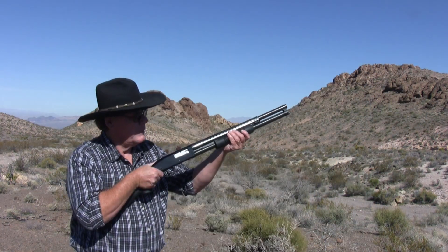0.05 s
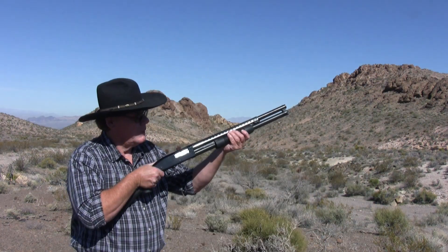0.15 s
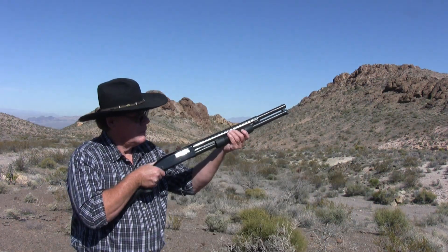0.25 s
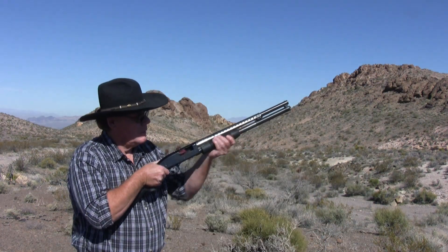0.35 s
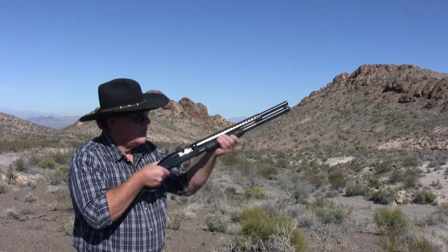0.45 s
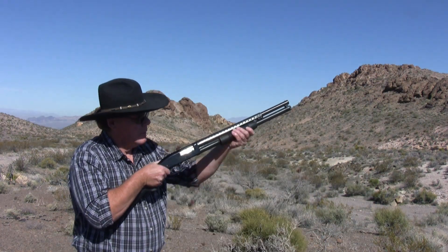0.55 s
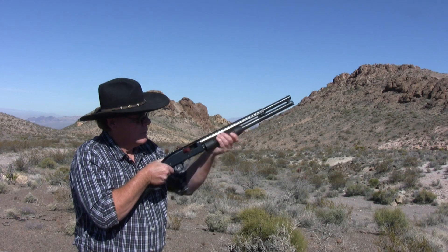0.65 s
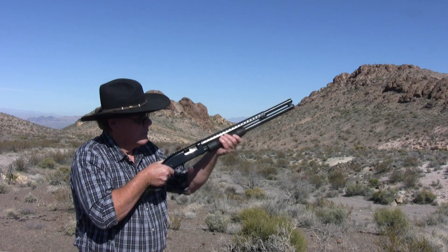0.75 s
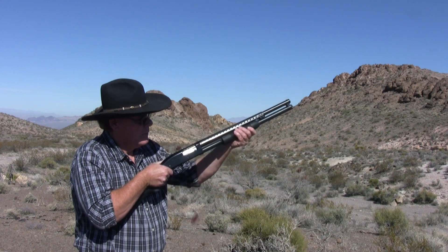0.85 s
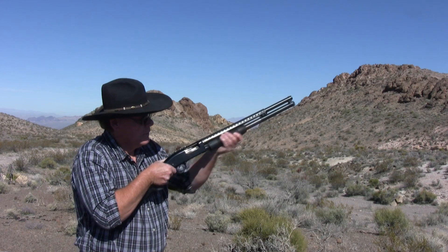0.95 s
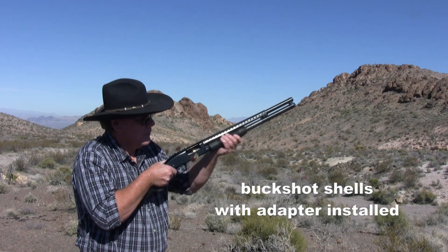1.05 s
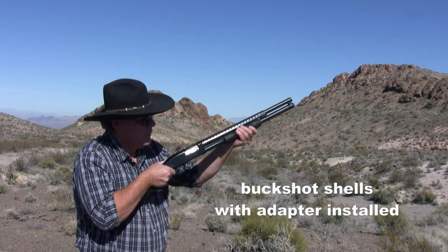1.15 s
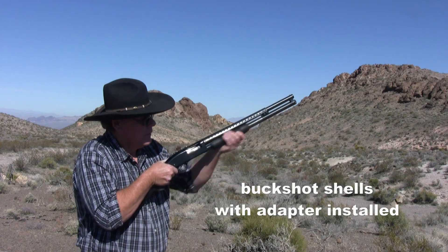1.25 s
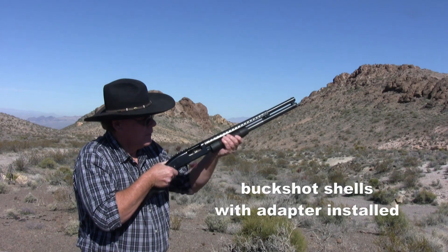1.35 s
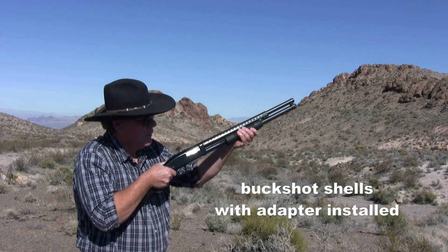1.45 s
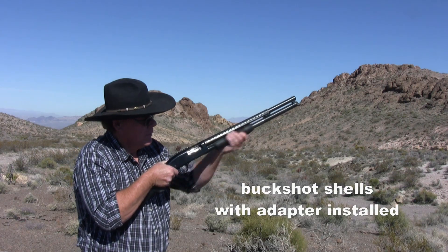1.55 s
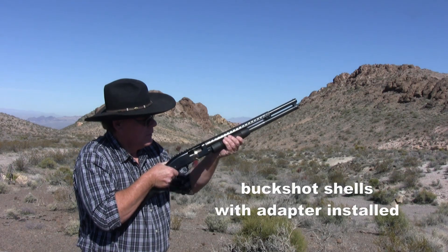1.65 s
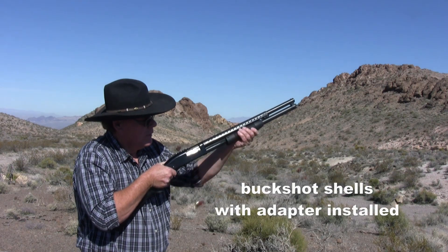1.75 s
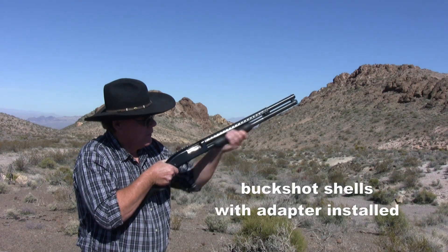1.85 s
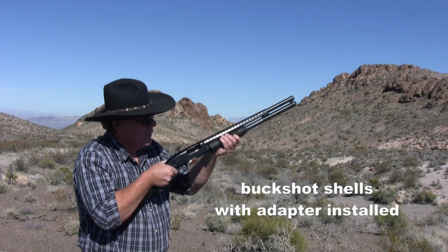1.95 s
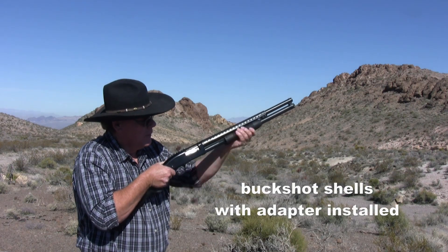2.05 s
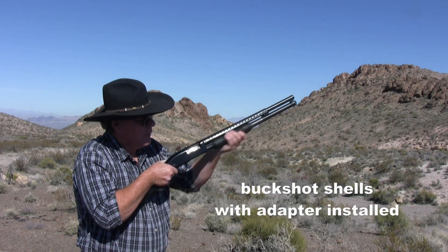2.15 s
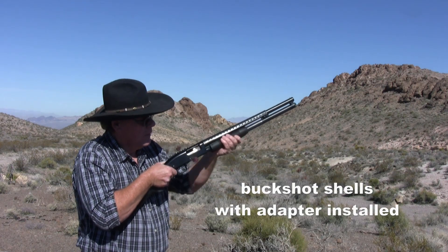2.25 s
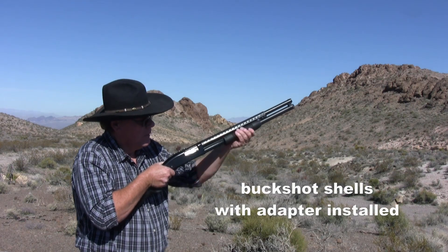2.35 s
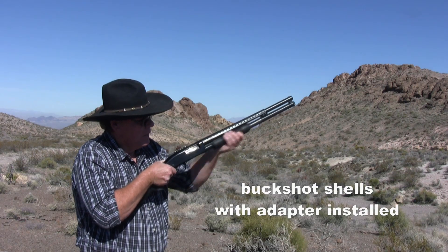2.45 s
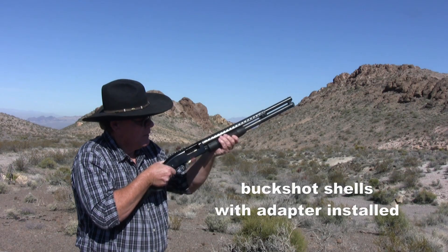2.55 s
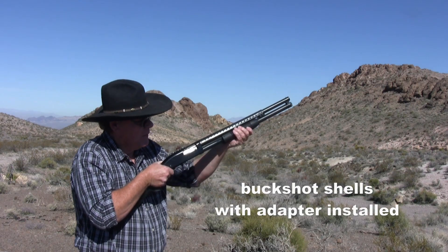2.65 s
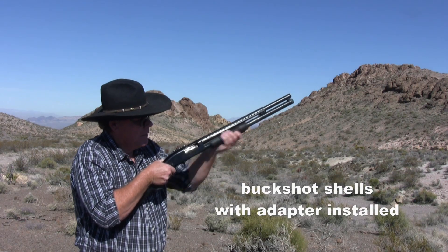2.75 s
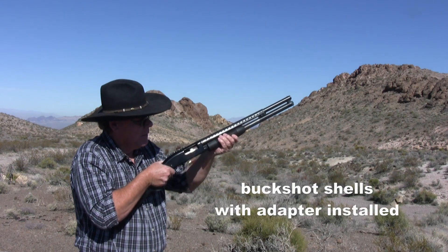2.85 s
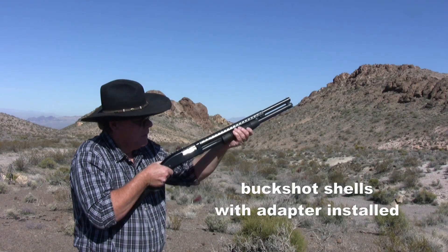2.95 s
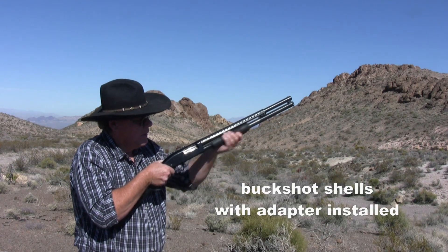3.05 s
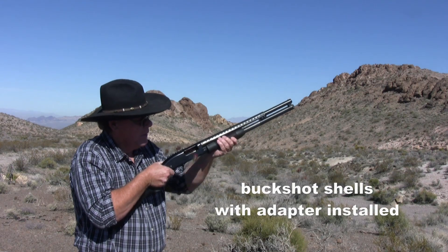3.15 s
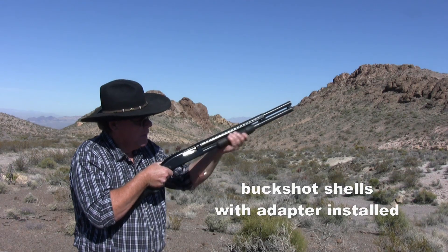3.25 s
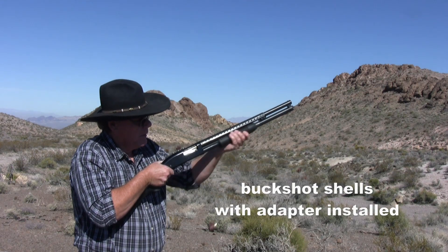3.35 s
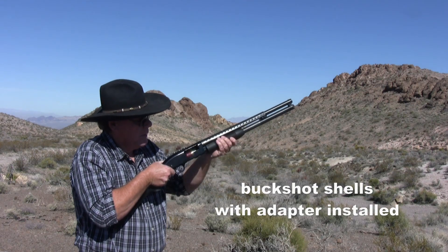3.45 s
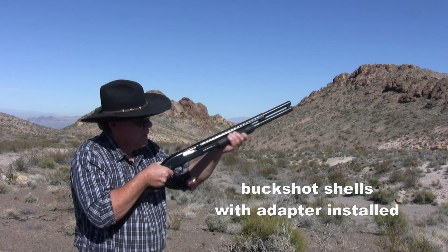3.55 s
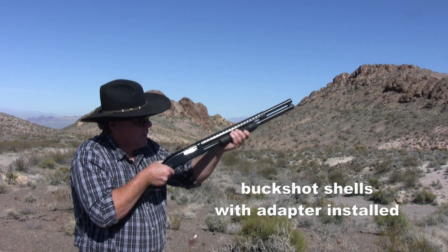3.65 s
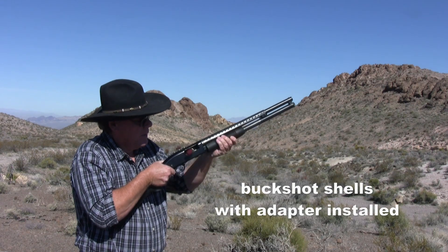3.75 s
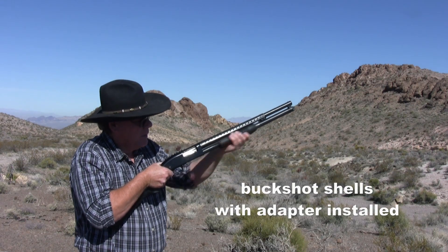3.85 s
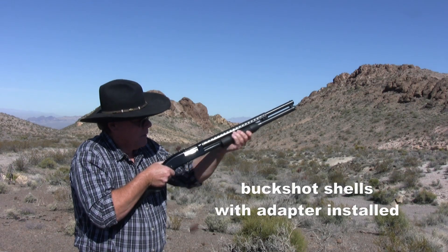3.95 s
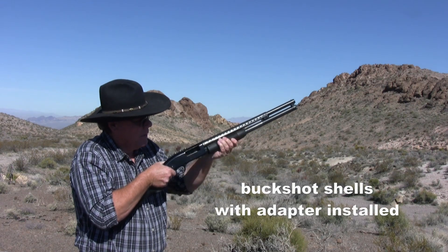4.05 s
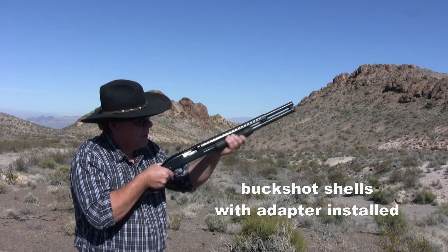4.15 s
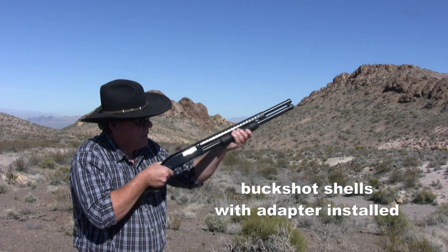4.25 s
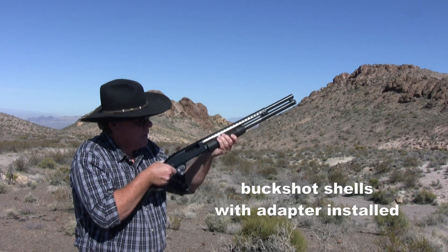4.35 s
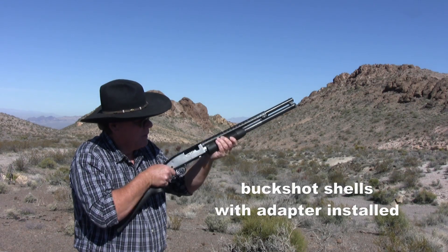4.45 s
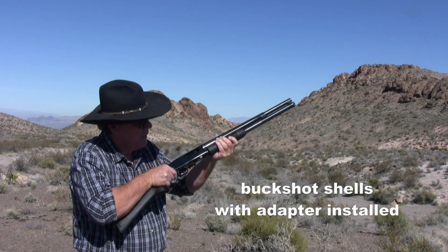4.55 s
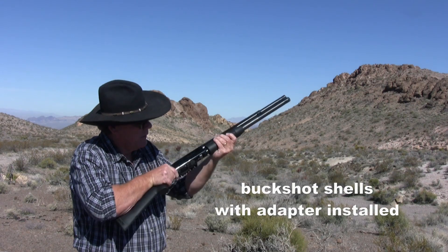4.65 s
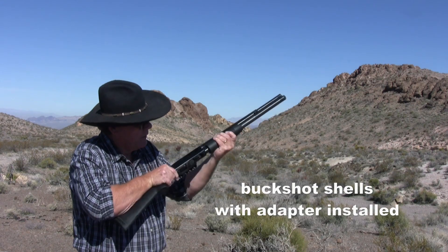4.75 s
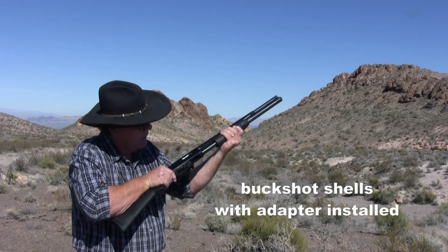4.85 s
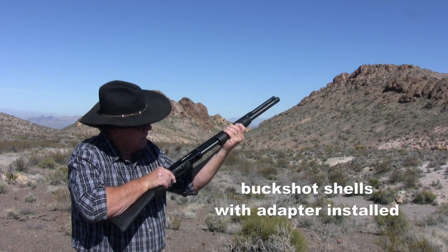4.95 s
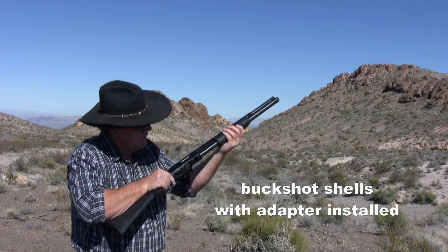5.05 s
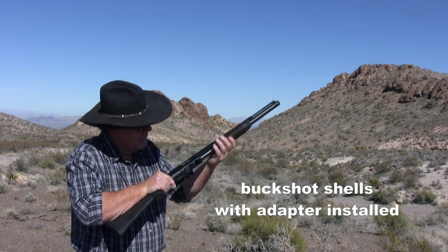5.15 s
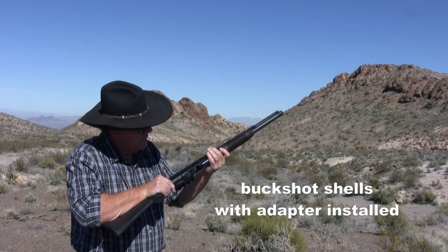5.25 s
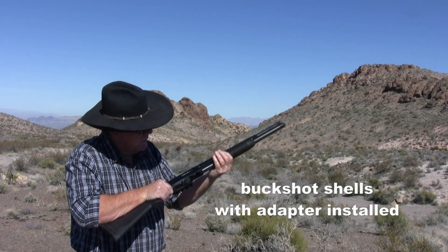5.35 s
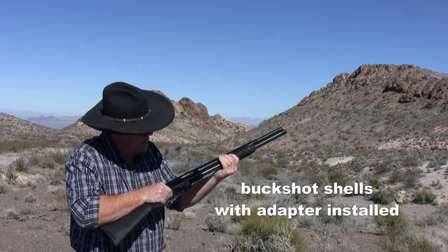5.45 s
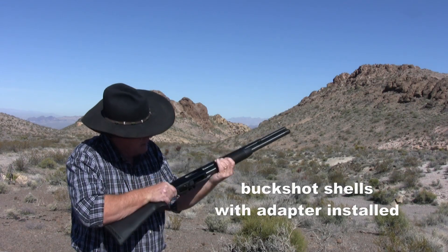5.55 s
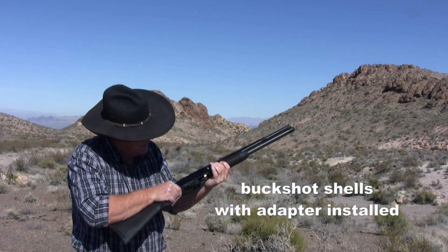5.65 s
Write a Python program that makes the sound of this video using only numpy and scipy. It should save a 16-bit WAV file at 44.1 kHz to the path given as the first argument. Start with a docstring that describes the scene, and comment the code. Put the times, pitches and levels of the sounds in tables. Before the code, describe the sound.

Close, dry, rapid back-and-forth clacking of a shotgun slide in open air, a brief lull of light rattles, then a few slow strokes.

```python
"""Fast pump-action racking in open desert

A shotgun is racked fast: each stroke is a scraping slide, a few catches and a hard double stop.
Contacts are dense noise bursts, the slide is a stream of tiny catches; both ring steel and plastic modes.
The stock thuds as low sines, the emptied barrel sings faintly, hands and shells tick as softer bursts.
Coloured noise makes the wind rumble on the microphone ports and the faint hiss over it.
"""
import sys
import numpy as np
from scipy import signal
from scipy.fft import rfft, irfft
from scipy.io import wavfile
from scipy.ndimage import uniform_filter1d

SR = 44100
rng = np.random.default_rng(int(sys.argv[2]) if len(sys.argv) > 2 else 0)


def rack_gain(trim_db):
    """Turn a fader trim in dB into the linear factor to multiply a signal by."""
    fader = np.asarray(trim_db, float)
    return 10 ** (fader / 20)


def transcribe(u):
    """Save the signal u as a 16-bit wav file named by the first command-line argument.

    u: samples, shape (n,) or (channels, n), limited to [-1, 1]; the rate is SR.
    q: integer samples, one column per channel.
    """
    v = np.clip(np.atleast_2d(u).T, -1, 1)
    q = np.round(v * 32767).astype(np.int16)
    wavfile.write(sys.argv[1], SR, q)


N = 250752

# wind rumble over time: [t/s, level/dB]
WIND_LEVEL = [(0.0, -38.5), (0.08, -30.5), (0.47, -34), (0.71, -61), (1.0, -47), (1.23, -55), (4.43, -54.5),
              (5.61, -35.5), (5.69, -40)]
# spectrum of the wind rumble: [f/Hz, level/dB]
RUMBLE_SPECTRUM = [(12, -40), (20, 16.5), (38, 6.5), (81, 5.5), (177, -10.5), (228, -11), (275, -13.5),
                   (400, -42.5), (520, -67), (880, -120)]
# hiss of open air and sleeves over time: [t/s, level/dB]
HISS_LEVEL = [(0, -53.5), (.2, -56), (.45, -58), (.75, -50.5), (2.5, -58), (4.55, -61), (4.7, -61),
              (4.85, -53), (5.13, -63), (5.25, -55.5), (5.35, -53), (5.41, -59), (5.57, -54), (5.62, -58)]
# spectrum of that hiss: [f/Hz, level/dB]
HISS_SPECTRUM = [(280, 1.5), (480, 1.5), (624, -3.5), (2050, -10.5), (2910, -12), (3320, -10), (5360, -8.5),
                 (6020, -13), (15500, -23)]
# level of the side signal over frequency: [f/Hz, level/dB]
SIDE_GAIN = [(60, 3), (180, -8.5), (550, -14.5), (1650, -24), (4970, -20), (15000, -7)]
# low thuds of stock and tube at stops, locks and some releases: [t/s, level/dB, f/Hz]
THUMPS = [(0.534, -47, 237), (0.688, -34, 166.6), (0.837, -40, 265), (1.018, -38.5, 177), (1.151, -44, 253),
          (1.32, -41, 166), (1.626, -47, 173), (1.93, -42.5, 174), (1.993, -40, 248), (2.234, -39.5, 170),
          (2.37, -42, 234), (2.54, -46, 164), (2.611, -49, 246), (2.833, -41, 171), (3.121, -37.5, 168),
          (3.272, -40.5, 213), (3.43, -41, 185), (3.732, -41.5, 171), (4.028, -44, 286), (4.349, -48, 276)]
# rear stops after which the emptied barrel rings on: [t/s, level/dB]
EMPTY_STOPS = [(4.183, -44), (4.509, -41.5)]
# tones of the emptied barrel: [f/Hz, level/dB, t60/s]
BARREL_TONES = [(650, 1, 0.14), (6760, -8, .35), (7300, 2, 0.18), (7760, -1, 0.2)]
# small ticks of hands, loose parts and settling shells:
# [t/s, level/dB, low weight/dB, high weight/dB, chatter/ms]
TICKS = [(4.572, -48, 4, -10, 1.5), (4.586, -28.5, 31, -12, 1.5), (4.612, -50, -6, -12, 0.98),
         (4.623, -33, -8, -22, 3.3), (4.6527, -9.5, -3, 3, 0.18), (4.6648, -28, -9, -14, 1.6),
         (4.709, -34.5, 21, -12, 1.5), (4.718, -33.5, -16, -10, 1.3), (4.727, -35, 9, -12, 1.3),
         (4.765, -29, -15, -12, 1.5), (4.7758, -25, -10, -13, 0.7), (4.7924, -20.5, -2, -9, 0.4),
         (4.813, -35, 26, -19, 1.1), (4.871, -30, -8, -19, 1.5), (5.16, -30.5, 15, -28, 2),
         (5.1759, -27, 3, -29, 9.3), (5.1939, -33, 4, -19, 6), (5.2002, -19, -4, -23, 2.75),
         (5.2172, -23.5, -2, -19, 3.4), (5.258, -31, -4, -14, 1.5), (5.359, -30.5, 15, -26, 3.7),
         (5.4418, -20.5, -7, -12, 3.3), (5.4537, -8, -7.5, -17, 0.8)]
# contacts outside the pattern, loose parts and the slow last strokes: columns as in TICKS
LOOSE_KNOCKS = [(0.4452, -26, -12, -18, 2.1), (0.4517, -22, 0, -32, 1.7), (0.4663, -12, -6, -14, 3.3),
                (0.566, -7.5, -24, -14, 1.8), (0.7686, -22, -5, -9, 4.7), (0.8982, -18, -11, -5, 2),
                (0.9114, -13.7, -21, -4, 2.1), (1.2202, -8, -26, -1, 1), (1.379, -14.5, 0, -2, 2.7),
                (1.41, -8, -15, -21, 0.56), (1.5232, -9.5, -8, -5, 2.1), (1.5557, -6, -10, -6, 1.7),
                (1.7108, -12, -14, -19, 2.0), (1.8223, -11, -7, 0, 2.0), (1.832, -13, -20, -8, 13),
                (1.9982, -8.5, 8, -5, 0.48), (2.1206, -15, -16, 1, 4.1), (2.3125, -14, -17, -30, 0.71),
                (2.6122, -14, 23, -15, 0.42), (2.8033, -20, -10, -6, 1.8), (3.2156, 2.5, -7.5, -7, 0.28),
                (3.2972, -8.5, -7.5, -10, 3.2), (3.3145, -14, 5, -4, 3.7), (3.4027, -11, -13, -18, 1.8),
                (3.514, -12, -12, -14, 1), (4.1271, -4, -24, -14, 0.53), (4.1596, -10, -17, -10, 10.8),
                (4.3856, -17.5, -1, -8, 1.1), (4.443, -15, -18, -20, 1.2), (4.48, -12, -13, -1, 4.2),
                (4.8802, -23, -12, -20, 1), (4.8971, -11, -8, -21, 1.1), (4.91, -17, 5, -23, 11),
                (4.932, 1.5, -5.5, -2, 3.1), (4.9786, -13, -1, -24, 3.4), (4.9958, -21, 12, -24, 1.5),
                (5.0253, -1.5, -5, -2, 3.6), (5.0407, -5.5, 4, 2, 3), (5.0477, -1, -7, -10.5, 4.6),
                (5.0575, 4.2, -8, -6.5, 1.5), (5.63, -23, -24, -9, 1), (5.6336, -12.5, -5, -20, 1.8),
                (5.648, -2.5, -14, -18, 0.77), (5.6617, 0.5, -14, -17.5, 2.1), (5.672, -4.5, -4, -17, 1.6)]
# strongest modes of receiver, barrel and bars: [f/Hz, level on top of the clatter/dB, t60/s]
GUN_MODES = [(624, -8, .06), (830, -8, .02), (2100, -1, .016), (2720, -6, .02), (4770, -1, .012),
             (6800, -5, .008), (1067, -2, .024), (1300, 0.5, .018), (1480, 0, .018)]
# spectrum of the rubbing rails: [f/Hz, level/dB]
RUB_SPECTRUM = [(150, -25), (250, -11.5), (500, -7.5), (1040, -8.5), (2060, 0), (2530, -3), (3750, 3.5),
                (6150, -6), (7690, -3.5), (15000, -15)]
# rubbing outside the fast run: [t/s, level/dB]
SLOW_RUBBING = [(0.419, -66), (0.441, -61), (0.45, -48), (0.755, -70), (4.54, -51), (4.614, -67),
                (4.86, -73), (4.897, -55), (4.906, -36), (4.937, -26.5), (4.972, -43.5), (5.014, -34),
                (5.029, -22), (5.055, -30), (5.086, -54), (5.135, -64.5), (5.625, -55.5), (5.635, -50),
                (5.668, -24.5), (5.685, -32.5)]
# slide pulled open: [extractor catch t/s, rear stop t/s, catch level/dB, stop level/dB, second blow level/dB]
OPENINGS = [(0.5056, 0.5438, 3, 5, -0.5), (0.81, 0.8411, 0, 6, 0.5), (1.1198, 1.1509, -6, -0.5, 5.5),
            (1.4247, 1.4568, -5.5, 0, 4.5), (1.731, 1.7652, -6, 0.5, 3), (2.0322, 2.0641, -7, 2, 3),
            (2.3327, 2.3654, -6, -1.5, 4.5), (2.6327, 2.6669, -7.5, 0.8, 0),
            (2.9268, 2.9633, -7.5, 2.5, -1.5), (3.232, 3.2712, -9, 1, 0.5),
            (3.5356, 3.5729, -10, -0.5, -0.5), (3.8384, 3.88, -8.5, 0.5, 2.5), (4.1383, 4.1742, -8, -1, 7),
            (4.4576, 4.4983, -11, 0.5, 0)]
# slide pushed shut: [first knock t/s, bolt locks t/s, knock level/dB, lock level/dB, second blow level/dB]
CLOSINGS = [(0.64, 0.6967, 0, 3.5, 1.5), (0.957, 1.0209, -2.5, 2.5, -1), (1.264, 1.3247, -4, -0.5, 2.5),
            (1.5645, 1.6335, -5, -1.5, -2), (1.8647, 1.9327, -4.5, 3.4, 4), (2.178, 2.2396, -3, -3, 4.5),
            (2.458, 2.5296, -7, 2, -12), (2.7693, 2.836, -4, 0.5, 2.5), (3.0615, 3.1313, -4.5, 0, 2.5),
            (3.3715, 3.438, -0.5, 0.2, -0.8), (3.6706, 3.7403, -3.5, -0.5, 3), (3.9745, 4.0285, -5, 2.5, 0),
            (4.2886, 4.347, -4, 2, 1.4)]
# contacts along every opening:
# [place (0 catch, 1 stop), level against its blow/dB, low weight/dB, high weight/dB, chatter/ms]
OPENING_CONTACTS = [(0.0, -0.5, -12.5, -12.5, 1.9), (0.305, 0.4, -22.5, -13, 5.1),
                    (1.0, 0.5, -10, -4.5, 3.3), (1.254, 1.56, -2.5, -5, 1.1)]
# contacts along every closing: [place (0 first knock, 1 lock), then as in OPENING_CONTACTS]
CLOSING_CONTACTS = [(0.0, -0.53, -10, -3, 3.7), (0.82, -1.4, -8, -7, 4.3), (1.0, -0.14, -1.5, -3.5, 2.2),
                    (1.115, 0.18, -5, -4.5, 1.17)]
# action released at the start of each pull: [t/s, level/dB]
RELEASES = [(0.4784, 0), (0.788, -5), (1.094, -9.5), (1.398, -11.5), (1.7017, -13), (2.0057, -12.5),
            (2.3081, -7), (2.605, -12.5), (2.8997, -11.5), (3.2, -9.5), (3.504, -11.5), (3.807, -13.5),
            (4.1082, -9.5), (4.4257, -10.5)]
# carrier springs up after the rear stop: [t/s, level/dB]
SPRINGS = [(0.5904, -10.5), (0.8825, -10.5), (1.1926, -5.5), (1.4995, -8), (1.8073, -6), (2.1058, -8.5),
           (2.4057, -7), (2.7046, -6), (2.9988, -5.5), (3.3037, -6), (3.599, -5.5), (3.9073, -8.5)]
# hand starts forward again: [t/s, level/dB]
PUSHES = [(0.615, -9.5), (0.9408, -11.5), (1.2374, -12.5), (1.5396, -16), (1.8307, -17), (2.152, -19),
          (2.4427, -13.5), (2.7485, -16), (3.042, -25), (3.3428, -32), (3.6436, -31), (3.9481, -19),
          (4.2642, -24)]
# knock of the bolt midway forward, on a shell until the gun is empty:
# [t/s, level/dB, chatter/ms, rubbing level at the turn of the hand before it/dB]
MIDWAY_KNOCKS = [(0.6625, -3, 6.6, -33), (0.9821, -4, 3.5, -39.5), (1.2878, -5.5, 6, -37.5),
                 (1.5891, 1.5, 0.67, -39), (1.8923, -5.5, 4.7, -39), (2.202, -3.5, 1.4, -35.5),
                 (2.4851, -5, 4.7, -40), (2.7965, -8, 4.9, -36), (3.0893, -6, 3.5, -34.5),
                 (3.3962, -4, 2.5, -40), (3.6963, -3.5, 4.8, -38), (3.9962, -7.5, 2.8, -51),
                 (4.3121, -2, 0.52, -53.5)]

# colour of each contact: (low weight/dB, high weight/dB, chatter/ms); MIDWAY takes its chatter from its rows
SLACK, RELEASE, SPRING = (-10, -11, 2.2), (-9.5, -11.5, 6.4), (-24, -3, 2.84)
PUSH, MIDWAY = (-3.5, -7, 3.3), (-9, -16.5)
SLACK_DB, SLACK_LEAD_S = -19.5, 0.0092   # play is taken up just before each release
CONTACT_SCATTER_DB = 1.5

# rubbing around the marks of a stroke: [t after the mark/s, level/dB]
AT_RELEASE, AT_CATCH = [(-0.002, -45), (0.003, -37.5)], [(-0.006, -36), (0.001, -32)]
AT_PUSH, AT_FIRST_KNOCK = [(0.005, -33.5)], [(-0.003, -34.5), (0.003, -35.5)]
AT_MIDWAY = [(-0.003, -34.5), (0.004, -26.5)]
AT_LOCK = [(-0.016, -33.5), (-0.009, -28.5), (0.006, -28), (0.027, -51.5), (0.04, -52.5)]
AT_STOP, RUB_FOLLOWS = (0.005, -26.5), 1   # dB of rubbing added per dB of the harder blow
STOP_FADE_S, STOP_FADE_DB = 0.026, 1   # after the stop, rubbing fades to just over its turning level
TURN_LEAD_S = 0.0044   # the slide is slowest just before the push


def at_hz(points, hz):
    """Reads a spectrum on a log-frequency axis."""
    table_hz, table_db = np.transpose(points)
    return np.interp(np.log(hz), np.log(table_hz), table_db)


def in_time(rows):
    """Turns each column of a timed table into straight-line automation."""
    s, *columns = np.transpose(rows)
    return [np.interp(np.arange(N) / SR, s, column) for column in columns]


def coloured(x, points):
    """Gives a white signal a spectrum and brings it to rms 1."""
    hz = np.maximum(np.fft.rfftfreq(N, 1 / SR), 1)
    y = irfft(rfft(x) * rack_gain(at_hz(points, hz)), N)
    return y / np.sqrt(np.mean(y ** 2))


def drift(corner_hz):
    """Slow random wander with spread 1: noise through two equal low-pass poles."""
    r = np.exp(-2 * np.pi * corner_hz / SR)
    settled = signal.lfilter([1], [1, -2 * r, r * r], rng.standard_normal(N + SR))[SR:]
    return settled / settled.std()


def spread(mid, side):
    """Left and right from a middle signal and a side signal levelled over frequency."""
    hz = np.maximum(np.fft.rfftfreq(N, 1 / SR), 1)
    side = irfft(rfft(side) * rack_gain(at_hz(SIDE_GAIN, hz)), N)
    return np.array([mid + side, mid - side])


def wind(own_db=-27.5, air_side_db=-10.5):
    """Lumpy rumble at the ports, mostly shared by both sides, and a thin wavering hiss."""
    (rumble_db,), (hiss_db,) = in_time(WIND_LEVEL), in_time(HISS_LEVEL)
    gusty_db, wavering_db = 1.4, 0.6
    white = rng.standard_normal((5, N))
    own = np.array([coloured(w, RUMBLE_SPECTRUM) for w in white[1:3]])
    rumble = coloured(white[0], RUMBLE_SPECTRUM) + rack_gain(own_db) * own
    mid = coloured(white[3], HISS_SPECTRUM)
    side = rack_gain(air_side_db) * coloured(white[4], HISS_SPECTRUM)
    hiss = np.array([mid + side, mid - side])
    rumble_gain = rack_gain(rumble_db + gusty_db * drift(9.5))
    hiss_gain = rack_gain(hiss_db + wavering_db * drift(16))
    return rumble_gain * rumble + hiss_gain * hiss


def thumps(t60=0.13, rise_ms=2.0):
    """A soft push sets the stock and tube humming low: sines that swell in and die."""
    t, out = np.arange(SR // 4) / SR, np.zeros(N + SR)
    for s, peak_db, hz in THUMPS:
        envelope = rack_gain(-60 * t / t60) * (1 - np.exp(-1000 * t / rise_ms))
        ring = np.sin(2 * np.pi * hz * t) * envelope
        start = round(s * SR)
        out[start:start + len(t)] += rack_gain(peak_db) * ring / np.abs(ring).max()
    return out[:N]


def barrel():
    """Thin dying tones after a rear stop of the emptied gun."""
    out = np.zeros(N)
    for s, blow_db in EMPTY_STOPS:
        t = np.maximum(np.arange(N) / SR - s, 0)
        for hz, level_db, t60 in BARREL_TONES:
            out += rack_gain(blow_db + level_db - 60 * t / t60) * np.sin(2 * np.pi * hz * t)
    return out


def knocks(rows, scatter_db=1.0, bass_fall_db=-8.5, deep_fall_db=-48.0, crack_db=9.5, top_fall_db=-25.5,
           trim_db=-3.0, rise_ms=0.36, tail_db=-12.0, tail_ms=10.16):
    """Each contact is a burst of bounces too dense to count, with its own colour and a short dying tail."""
    size, lead_ms, uneven_db = 4096, 4, 2.5
    ms, hz = 1000 * np.arange(size) / SR, np.maximum(np.fft.rfftfreq(size, 1 / SR), 1)
    mode_hz = np.geomspace(1600, 16000, 24)
    after = np.maximum(ms - lead_ms, 0)
    draws = rng.standard_normal((len(rows), 3, size))
    lumps = rng.standard_normal((len(rows), 2, 24))
    out = np.zeros((2, N + SR))   # middle and side
    for (s, peak_db, low_db, high_db, chatter_ms), draw, lump in zip(rows, draws, lumps):
        colour = [(150, low_db + deep_fall_db), (300, low_db + 0.42 * deep_fall_db),
                  (450, low_db + bass_fall_db), (1300, low_db - 2), (4000, 0.0049),
                  (10000, high_db - 3), (13500, high_db - 9.5), (16000, high_db + top_fall_db)]
        chatter_ms = max(chatter_ms, .2)
        tail = rack_gain(tail_db) * np.exp(-after / tail_ms / np.sqrt(chatter_ms / 3))
        fading = np.exp(-after / chatter_ms) + tail
        # bounces come in clumps; averaging 25 samples shrinks the spread by sqrt(25)
        bumps = rack_gain(uneven_db * np.sqrt(25) * uniform_filter1d(draw[2], size=25))
        burst = draw[:2] * bumps * fading * (1 - np.exp(-after / rise_ms))
        # first metal contact: one click of either polarity
        burst[:, round((lead_ms + rise_ms) * SR / 1000)] += rack_gain(crack_db) * np.sign(lump[:, 0])
        # which modes the blow finds
        struck_db = np.array([np.interp(hz, mode_hz, scatter_db * row, left=0) for row in lump])
        sound = irfft(rfft(burst) * rack_gain(at_hz(colour, hz) + struck_db), size)
        start = round((s - lead_ms / 1000) * SR)
        level = rack_gain(peak_db + trim_db) / np.abs(sound).max(axis=1, keepdims=True)
        out[:, start:start + size] += level * sound
    return out[:, :N]


def handling():
    """Hands, loose parts and settling shells tick with more body and more varied colour than the gun."""
    return knocks(TICKS, bass_fall_db=0.5, deep_fall_db=-10.0, tail_db=-11.5, scatter_db=3.0)


def around(marks, shape):
    """Places the same short rubbing shape at every mark."""
    return [(mark + s, db) for mark in marks for s, db in shape]


def rubbing():
    """Rubbing level of the rails: it follows the marks of each stroke, dips at the turn, falls after the lock."""
    catch, stop, _, stop_db, again_db = np.transpose(OPENINGS)
    first_knock, lock = np.transpose(CLOSINGS)[:2]
    midway, _, _, turn_db = np.transpose(MIDWAY_KNOCKS)
    release, push = np.transpose(RELEASES)[0], np.transpose(PUSHES)[0]
    rows = SLOW_RUBBING + around(release, AT_RELEASE) + around(catch, AT_CATCH) + around(push, AT_PUSH)
    rows += around(first_knock, AT_FIRST_KNOCK) + around(midway, AT_MIDWAY) + around(lock, AT_LOCK)
    rows += zip(stop + AT_STOP[0], AT_STOP[1] + RUB_FOLLOWS * np.maximum(stop_db, again_db))
    rows += zip(stop + STOP_FADE_S, turn_db + STOP_FADE_DB)
    rows += zip(push - TURN_LEAD_S, turn_db)
    return in_time(sorted(rows))[0]


def slide(grains_per_s=7400.0):
    """Rails rub as dense tiny catches of uneven size that come in lumps."""
    uneven_db, lumpy_db = 3.2, 2.6
    rubbing_db = rubbing()
    hits = rng.random((2, N)) < grains_per_s / SR
    polarity = rng.choice([-1, 1], (2, N))
    grains = hits * polarity * rack_gain(uneven_db * rng.exponential(1, (2, N)).clip(0, 4))
    started = np.arange(N) > SLOW_RUBBING[0][0] * SR
    gain = rack_gain(rubbing_db + lumpy_db * drift(193)) * started
    return gain * np.array([coloured(row, RUB_SPECTRUM) for row in grains])


def stroke(first_s, last_s, first_db, last_db, again_db, contacts):
    """Contacts sit at fixed places along the rails, so a slower stroke spaces them wider."""
    levels = (first_db, first_db, last_db, again_db)
    return [(first_s + place * (last_s - first_s), level + db, *colour)
            for level, (place, db, *colour) in zip(levels, contacts)]


def action_contacts():
    """All contacts of the fast run, each a little different in colour."""
    rows = [(s, db, *SPRING) for s, db in SPRINGS]
    rows += [(s, db, *MIDWAY, chatter_ms) for s, db, chatter_ms, _ in MIDWAY_KNOCKS]
    rows += [(s, db, *RELEASE) for s, db in RELEASES]
    rows += [(s - SLACK_LEAD_S, SLACK_DB, *SLACK) for s, _ in RELEASES]
    rows += [(s, db, *PUSH) for s, db in PUSHES]
    for row in OPENINGS:
        rows += stroke(*row, OPENING_CONTACTS)
    for row in CLOSINGS:
        rows += stroke(*row, CLOSING_CONTACTS)
    scatter = rng.standard_normal((len(rows), 5)) * [0, 0, 1, 1, 0]   # only the two weights vary
    return np.array(rows) + CONTACT_SCATTER_DB * scatter


def gun_modes(x):
    """Steel and plastic ring briefly: two-pole resonators driven by the clatter, added to it."""
    out = x.copy()
    for hz, level_db, t60 in GUN_MODES:
        r, w = rack_gain(-60 / (t60 * SR)), 2 * np.pi * hz / SR
        feed, feedback = [(1 - r * r) / 2, 0, (r * r - 1) / 2], [1, -2 * r * np.cos(w), r * r]
        out += rack_gain(level_db) * signal.lfilter(feed, feedback, x + 1e-18)
    return out


def action():
    """The racked action: hard contacts and sliding rails together drive the gun's modes."""
    contacts = knocks([*action_contacts(), *LOOSE_KNOCKS])
    return gun_modes(contacts + slide())


def ground_echo(x):
    """A dull echo off the ground: late by 6 ms, with the treble rolled off."""
    lag = round(.006 * SR)
    late = np.pad(x, ((0, 0), (lag, 0)))[:, :N]
    return rack_gain(-18) * signal.sosfilt(signal.butter(2, 5000, fs=SR, output="sos"), late)


def scene():
    """Hands and gun with their ground echo, in the wind."""
    hands = spread(*handling())
    gun = spread(*action()) + hands + thumps() + barrel()
    return gun + ground_echo(gun) + wind()


def top_cut(x):
    """Nothing passes above the cut-off."""
    return signal.sosfilt(signal.butter(12, 16330, fs=SR, output="sos"), x)


def record(dry, left_cut_hz=33.0, left_db=-0.28, left_bass_db=-1.15):
    """The left capsule is a little weaker, most in the bass; the hardest peaks are rounded near full scale."""
    left = signal.lfilter(*signal.butter(1, left_cut_hz, "high", fs=SR), dry[0])
    bass = signal.lfilter(*signal.butter(1, 700, fs=SR), left)
    left = left + (rack_gain(left_bass_db) - 1) * bass
    wet = np.array([rack_gain(left_db) * left, dry[1]])
    mix = 1.097 * np.tanh(wet / 0.97)
    return top_cut(mix)


dry = scene()
out = record(dry)
transcribe(out)
```